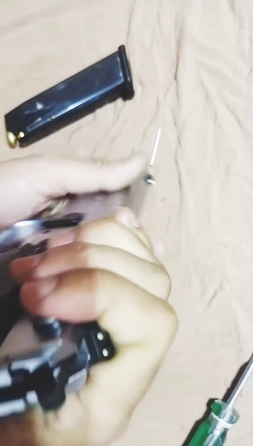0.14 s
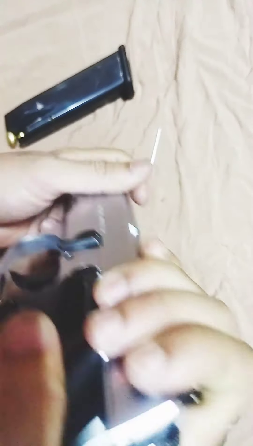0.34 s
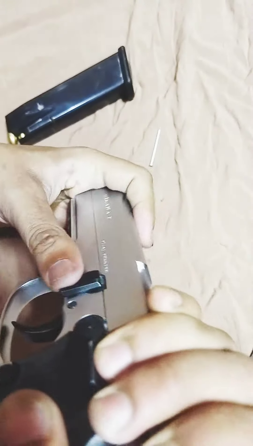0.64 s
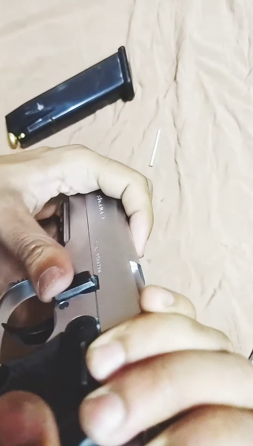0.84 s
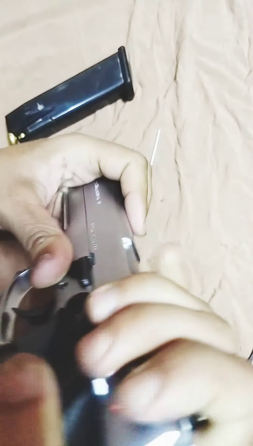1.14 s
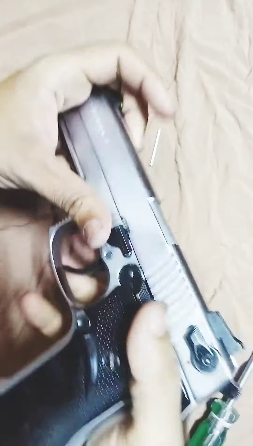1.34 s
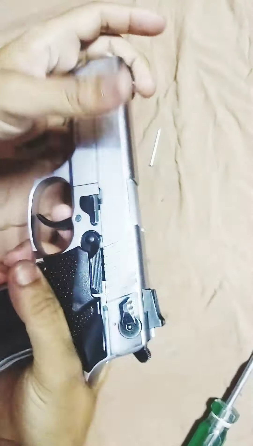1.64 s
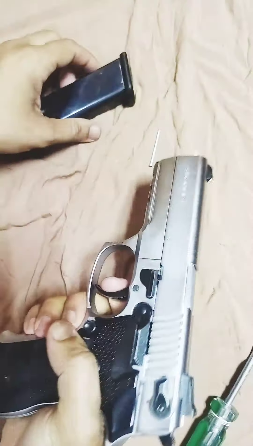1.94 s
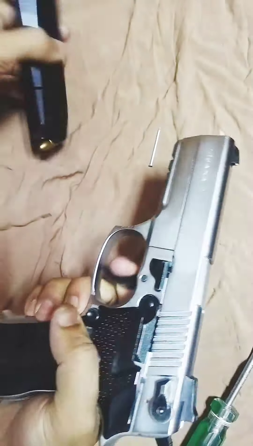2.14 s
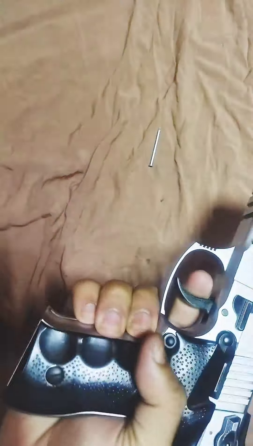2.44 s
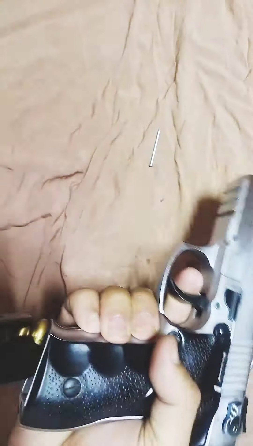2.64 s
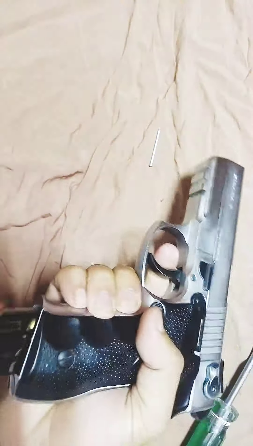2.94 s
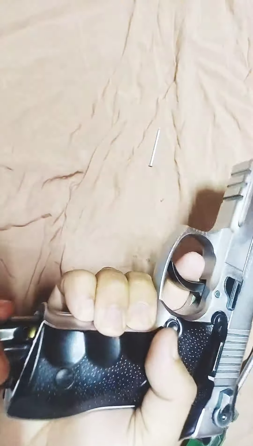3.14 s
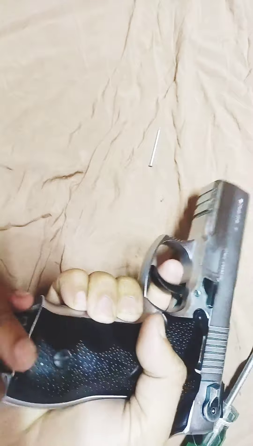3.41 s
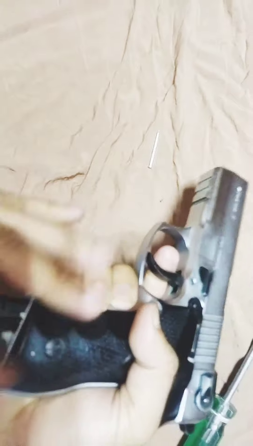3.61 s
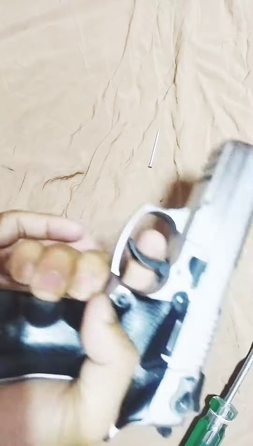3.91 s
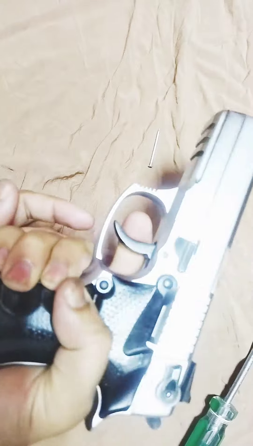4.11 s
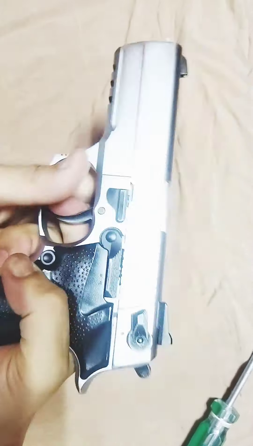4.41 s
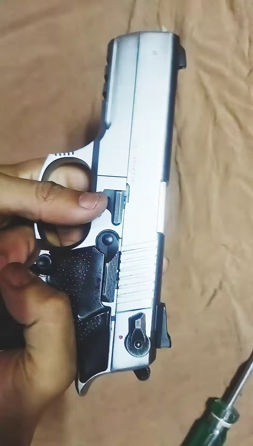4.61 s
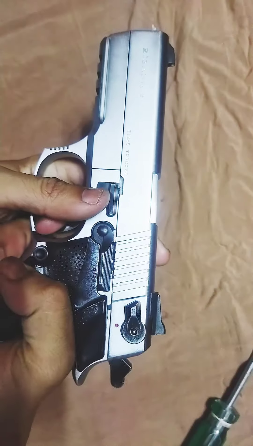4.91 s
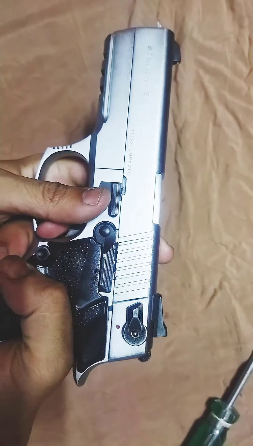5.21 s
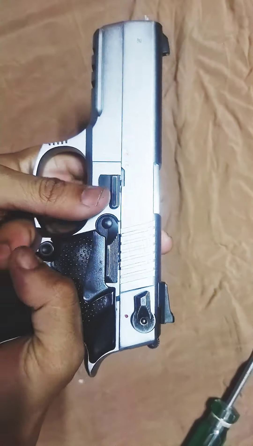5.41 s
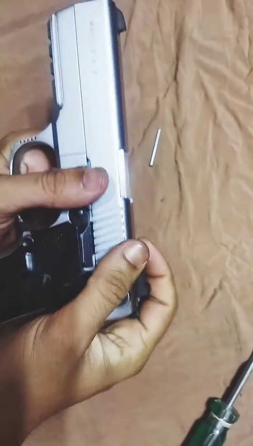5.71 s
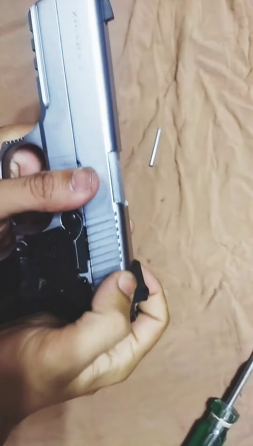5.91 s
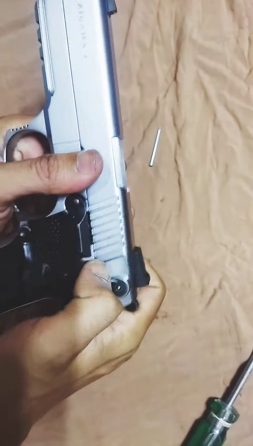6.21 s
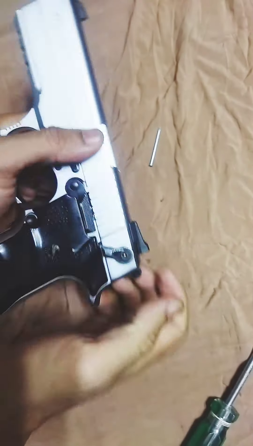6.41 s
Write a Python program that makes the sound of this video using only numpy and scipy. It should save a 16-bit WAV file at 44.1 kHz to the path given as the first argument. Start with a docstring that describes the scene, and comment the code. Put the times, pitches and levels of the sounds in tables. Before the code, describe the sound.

Sharp metal clicks, snaps and taps of a steel pistol being handled up close in a small room, over a faint fan hum.

```python
"""Sharp metal snaps, taps and slides: a steel pistol handled close to a phone in a small furnished room.
Each contact is a short rattle of colliding edges plus two knocks, echoed by the walls. The slide rings
when it locks home and, harder, when the hammer falls. Fingers rub the grip, a few puffs and jolts
reach the phone, and a fan hums faintly under the room noise."""
import sys
import numpy as np
from scipy import signal
from scipy.fft import rfft, irfft
from scipy.io import wavfile
from scipy.ndimage import uniform_filter1d

SR = 44100
rng = np.random.default_rng(int(sys.argv[2]) if len(sys.argv) > 2 else 0)


def to_wav(s):
    """Save 16-bit WAV."""
    ch = np.atleast_2d(s).T  # columns
    pcm = np.round(np.clip(ch, -1, 1) * 32767)  # PCM
    wavfile.write(sys.argv[1], SR, pcm.astype(np.int16))


N = 288855
T = np.arange(N) / SR
SIDE_SIGN = np.array([[1], [-1]])  # left, right


def amp(db):
    return 10 ** (np.asarray(db) / 20)


def unit_rms(x):
    return x / np.sqrt(np.mean(x ** 2))


def fade(t, t60_s):
    """Exponential decay, -60 dB at t60_s."""
    return np.exp(-np.log(1000) * t / max(t60_s, 1e-3))


def on_bins(table, size):
    """Interpolate (Hz, value) rows onto FFT bins."""
    hz, value = np.transpose(table)
    return np.interp(np.log(np.fft.rfftfreq(size, 1 / SR) + 1), np.log(hz + 1), value)


def colour(x, table):
    """Filter by (Hz, dB) rows."""
    size = x.shape[-1]
    return irfft(rfft(x) * amp(on_bins(table, size)), size)


def noise_band(hz, width_hz):
    """Noise through one resonance."""
    return unit_rms(signal.lfilter(*signal.iirpeak(hz, hz / width_hz, fs=SR), rng.standard_normal(N)))


def wander(rate_hz):
    """Random steps, smoothed twice."""
    hold = int(SR / rate_hz)
    steps = np.repeat(rng.standard_normal(N // hold + 1), hold)
    return uniform_filter1d(uniform_filter1d(steps, hold), hold)[:N]


def stereo(mid, side, correlation):
    return np.sqrt(1 + correlation) * mid + np.sqrt(1 - correlation) * SIDE_SIGN * side


def add(out, start_s, x):
    i = int(start_s * SR)
    out[..., i:i + x.shape[-1]] += x[..., :N - i]


def room_noise():
    """Slowly swelling noise, alike left and right in the bass; the treble flickers."""
    # Noise spectrum. Each row: frequency in Hz, relative density in dB.
    spectrum = [(15, -81.5), (25, -53), (85, -21.5), (114, -6), (171, -9), (196, -3.5), (337, -9.5),
                (441, -15), (548, -10), (893, -18.5), (995, -15), (2570, -24), (4660, -43),
                (13800, -52.5), (16200, -49.5)]
    # Stereo likeness. Each row: frequency in Hz, left-right correlation.
    likeness = [(60, 0.87), (130, 0.86), (290, 0.73), (640, 0.49), (1410, -0.16), (3100, 0.05),
                (6820, -0.76), (15000, 1)]
    correlation = np.clip(on_bins(likeness, N), -.95, .98)
    mid, side = rfft(rng.standard_normal((2, N)))
    noise = unit_rms(colour(irfft(stereo(mid, side, correlation), N), spectrum))
    treble = colour(noise, [(2500, -40), (4500, 0), (16000, 0)])
    flicker_db = 2.5 + 2.5 * wander(12)
    noise = noise + treble * (amp(flicker_db) - 1)
    return amp(-50.5 + 1.5 * wander(3)) * noise


def fan_hum():
    """A wavering fan tone over two lower bands of rumble."""
    # Hum levels. Each row: time in seconds, tone in dB, rumble in dB.
    levels = [(0, -54, -50), (.27, -50, -55), (.42, -60.5, -51), (.6, -48.5, -56.5), (.95, -57.5, -49),
              (1.5, -54, -53.5), (1.81, -72, -48.5), (1.95, -51, -53), (2.25, -53, -53.5),
              (3.1, -56, -56.5), (3.6, -55.5, -53), (3.9, -52.5, -56), (4.25, -60, -56), (4.6, -54.5, -57),
              (5.1, -62, -53.5), (5.5, -56, -57.5), (5.9, -50, -56.5), (6.55, -64, -61)]
    time_s, tone_db, rumble_db = np.transpose(levels)
    tone_hz = 174.5 + 3 * wander(8)
    tone = np.sqrt(2) * np.sin(2 * np.pi * np.cumsum(tone_hz) / SR)
    rumble = unit_rms(noise_band(127.5, width_hz=15) + 0.65 * noise_band(111.5, width_hz=12))
    flutter_db = 3 * wander(11)
    tone_gain = amp(np.interp(T, time_s, tone_db) + flutter_db)
    return tone_gain * tone + amp(np.interp(T, time_s, rumble_db)) * rumble


def rubbing():
    """Skin slides on steel: grainy hiss and a duller scuff. Strokes swell, hold and die away. The scene also
    opens on a fading hiss, and another hiss trails the snap at 0.38 s."""
    # Strokes. Each row: time of full level in seconds, hold in seconds, level in dB, swell and decay
    # in seconds per 20 dB (sign ignored), scuff relative to hiss in dB.
    strokes = [(0, 0.021, -51, .05, 0.07, 2.5), (0.196, 0.019, -66, -0.4, -0.3, -22),
               (0.312, 0.18, -70, -0.1, 0.08, 5), (.405, 0, -59.5, -0.7, 0.17, -8),
               (.44, 0, -80, 8, 0.6, -9), (1.329, 0.035, -63.5, 0.3, 0.24, -8),
               (2.335, 0.033, -64.5, 0.37, .1, 2.5), (3.59, 0.022, -66.5, 0.3, .04, -6),
               (3.868, 0.0041, -60.5, 0.28, 0.26, 1), (3.94, 0.031, -40.5, 0.05, -0.0073, -9.5),
               (4.04, .01, -58, 0, .05, -6), (4.126, .045, -32.5, 0, .06, -12.5),
               (4.26, 0.052, -59.5, -0.05, 0.18, 0.5), (5.55, 0, -67, 0.33, 0.21, 11.5),
               (6.165, 0, -52, 0.11, -0.08, -8.5), (6.458, 0.01654, -72, 0, .2, -2.5)]
    # Hiss spectrum. Each row: frequency in Hz, relative density in dB.
    hiss_spectrum = [(4000, -13), (5000, -3.5), (8200, -9.5), (9700, -1), (11000, -15), (12400, 0.5),
                     (15500, -7.5)]
    grain = amp(2.5 * wander(150) + 1.6 * wander(25))
    mid, side = rng.standard_normal((2, N))
    friction = grain * stereo(mid, side, correlation=0)
    hiss = unit_rms(colour(friction, [(2500, -56)] + list(hiss_spectrum)))
    scuff = unit_rms(colour(friction, [(500, -23), (1500, -1), (4000, -4), (6000, -36.5)]))
    out = np.zeros((2, N))
    for full_s, hold_s, db, swell_s, decay_s, scuff_db in strokes:
        drop_db = 20 * np.where(T < full_s, (full_s - T) / abs(swell_s),
                                np.maximum(T - full_s - hold_s, 0) / abs(decay_s))
        out += amp(db - drop_db) * (hiss + amp(scuff_db) * scuff)
    return out


def thumps():
    """Air puffs and jolts at the phone: pressure builds, lets go and swings out, heavily damped."""
    # Each row: time in seconds, level in dB, build-up in seconds, pitch in Hz, T60 in seconds,
    # right gain relative to left.
    jolts = [(0.9623, -16.5, 0.0047, 400, 0.013, 0.4), (4.108, -30, 0.003, 60.71, 0.026, -.3),
             (5.161, -20.5, 0.00077, 224.6, 0.039, 0.51)]
    out, t = np.zeros((2, N)), np.arange(-512, 8192) / SR
    for time_s, db, build_s, hz, t60_s, right_gain in jolts:
        build = np.clip(1 + t / build_s, 0, 1)
        swing = np.cos(2 * np.pi * hz * t) * fade(np.abs(t), t60_s)
        add(out, time_s + t[0], amp(db) * np.array([[1], [right_gain]]) * np.where(t < 0, build, swing))
    return out


def wall_echoes(send):
    """Dense echoes that build up after the first wall and last longest in the midrange."""
    # Echo spectrum. Each row: frequency in Hz, relative level in dB.
    spectrum = [(300, -17), (1000, -4), (2000, -0.5), (4000, -3), (8000, -4), (12000, -2), (15500, -1.5)]
    # Room decay. Each row: frequency in Hz, T60 in seconds.
    decay_times = [(500, 0.16), (1500, .45), (4000, .45), (8000, 0.33), (14000, 0.24)]
    first_wall_s, early_gain, echo_db = .013, .55, -7.5
    t = np.arange(int(.7 * SR)) / SR
    mid, side = colour(rng.standard_normal((2, len(t))), spectrum)
    _, frame_s, frames = signal.stft(stereo(mid, side, correlation=0.23), SR, nperseg=256)
    decay = np.exp(-np.log(1000) * frame_s / on_bins(decay_times, size=256)[:, None])
    tail = signal.istft(frames * decay, SR, nperseg=256)[1][:, :len(t)]
    tail *= early_gain + (1 - early_gain) / (1 + np.exp(-(t - first_wall_s) / 2e-3))
    tail /= np.sqrt(np.sum(tail ** 2) / 2)
    return amp(echo_db) * signal.fftconvolve(send[None], tail, axes=1)[:, :N]


def slide_ring(blows):
    """Blows ring the hand-damped slide; each microphone port gets its modes with random signs."""
    # Steel modes. Each row: frequency in Hz, level in dB, T60 in seconds.
    steel_modes = [(3300, -8, .015), (3750, -7, .015), (4100, -7, .015), (4600, -9, .015),
                   (5300, -12, .012), (6080, -9, .03), (6200, -10, .03), (6580, -6, .03), (6830, -5, .03),
                   (7030, -7, .04), (8740, -8, .05), (8860, -8, .06), (9010, -9, .05), (9600, -11, .02),
                   (12070, -6, .04), (12280, -5, .04), (12490, -5, .04), (13800, -9, .02), (14450, -7, .02)]
    t = np.arange(SR // 4) / SR
    modes = np.array([amp(db) * fade(t, t60_s) * np.sin(2 * np.pi * hz * t)
                      for hz, db, t60_s in steel_modes])
    port_gains = amp(2 * SIDE_SIGN) * rng.choice([-1, 1], (2, len(steel_modes)))
    return signal.fftconvolve(blows[None], port_gains @ modes, axes=1)[:, :N]


def knock(t, hz, db, t60_cycles):
    """One struck mode: swings up within a cycle, then decays."""
    envelope = np.clip(t * hz, 0, 1) * fade(np.abs(t), t60_cycles / hz)
    return amp(db) * envelope * np.sin(2 * np.pi * hz * t)


def small_modes(x, count=120, spread_db=3.5):
    """Many small modes add random spectral peaks and dips."""
    hz = np.linspace(0, SR / 2, count)
    return colour(x, list(zip(hz, spread_db * rng.standard_normal(count))))


def chatter_spectrum(envelope):
    """Colliding edges: a whitened noise burst, partly shared by the two ports."""
    noise = rng.standard_normal((3, len(envelope)))
    spectrum = rfft((noise[0] + 1.2 * noise[1:]) * envelope)
    return spectrum / np.sqrt(uniform_filter1d(np.abs(spectrum) ** 2, size=50))


def contacts():
    """Steel edges scrape in, meet and chatter out. Returns direct sound, slide blows and echo send."""
    # Contacts. Each row: time in seconds, level in dB, tilt in dB per octave going down and going up
    # from the knee, hollow knock in Hz and relative dB, edge knock in Hz and relative dB,
    # left minus right in dB, echo send in dB.
    clicks = [(0.3809, -18.5, -5, 4, 870.2, -25.5, 4030, -12, -1, -21),
              (0.9611, 0, -3.5, -2, 1350, -14.5, 4300, -10, -1.5, -9),
              (1.1222, -18.5, -1, -10.5, 1225, -8, 1640, -12, 0.5, -13.5),
              (1.7167, -27.5, -4.5, -8.5, 1103, -1, 2230, 6.5, 9, -9.5),
              (2.535, -10.5, -5.5, -1.5, 1067, -25, 4844, -9.5, 2, -12),
              (2.5575, -24.5, 5.5, -6, 1480, -18, 1870, -5, -4, -2.5),
              (2.6692, -30, 1, -2.5, 1020, -12, 2150, -13, 2, -8),
              (2.7366, -16.5, -2.5, -3, 721.6, -17.5, 3630, -12, 0, -7),
              (2.764, -31, 5, -11.5, 905, -10, 1640, -11, 2, -4),
              (2.7805, -24, 2.5, -5, 1210, -20, 2230, -4.5, 2, -8),
              (2.8309, -30.5, 7.5, -7.5, 676.2, -7, 2240, 1, 0, 3),
              (2.8623, -5, 1, -3.5, 890, -3.5, 2180, -8.5, 0, -12.5),
              (2.8804, -26, 4, -12.5, 800, -18, 2200, -14, 16, -11),
              (3.027, -22, 1, -3.5, 905, -29, 4770, -0.5, 4.5, -9),
              (3.1242, -31.5, 2.5, -23, 1434, -13, 1760, -4, -1, -9),
              (3.1586, -26.5, 3, -5, 1018, -2.5, 2940, -8.5, 2.5, -13),
              (3.4639, -15.5, 1.5, -13.5, 1500, -3.5, 1690, -12.5, -1, -12.5),
              (3.4754, -25.5, 4, -3, 1220, -19, 2180, -3.5, 5, -6),
              (3.5063, -22.5, 4, -12, 1500, -5, 1760, -4, 0, -26),
              (3.6231, -38, 7, -7.5, 1340, -16, 1750, -1, -0.5, -11.5),
              (3.7812, -33.5, 5.5, -19, 1407, -21.5, 1720, -6, 0, -9),
              (3.8655, -26.5, 1, -12.5, 1010, -20, 1663, -6.5, 2, -6),
              (3.9458, -14.5, 1.5, -5, 1170, -29.5, 2196, -9, -3, -4.5),
              (3.9504, -10.5, -2, -5.5, 1230, -7.5, 1607, -10.5, 5.5, -18),
              (3.9584, -19.5, -0.5, -15, 1170, -2, 1813, -3.5, -8, -20),
              (4.0454, -36, 4, 3, 1050, -18.5, 1890, -9, 1, -8),
              (4.107, -10.5, -3.5, 2, 1002, -18, 4970, -21, 1, 0.5),
              (5.0438, -30, 2.5, 1.5, 748, -20.5, 3500, -13, 5.5, -9.5),
              (5.1567, -2.5, -2.5, 1, 1370, -23, 5200, -5.5, -6, -1),
              (5.1619, -6.5, -1.5, 1.5, 1045, -15, 4100, -19, 15, -2.5),
              (5.1644, -7.5, 0.5, 1.5, 930, -15.5, 3314, -13, -6.5, 1),
              (5.1704, -5, -4, 15, 1427, -23, 4200, -12, -2, -8.5),
              (5.1794, -5, -8, 7.5, 900, -28.5, 3520, -11, 0, 2),
              (5.4379, -35.5, -4, -8, 671, -25, 3459, -5, 4, -4),
              (5.5013, -20.5, -2, -1.5, 1270, -18, 4996, -6, 1, -7),
              (6.0939, -18.5, -5.5, -4.5, 1088, -20.5, 4440, -8, 3.5, -14.5),
              (6.1339, -22.5, -3, 4.5, 1312, -26.5, 2156, -12, 13, -10),
              (6.15, -29.5, 0.5, 5, 972, -24, 2540, -14.5, 4, -16)]
    # Small parts radiate no bass. Each row: frequency in Hz, gain in dB.
    radiation = [(350, -44), (560, -15.5), (750, -2), (900, 0.5), (6000, -0.5), (9000, -3), (13500, 0.5),
                 (16500, -3)]
    knee_hz = 4165
    lock_s, hammer_s = (.95, .97), (5.15, 5.19)  # from, to
    direct, blows, send = np.zeros((2, N)), np.zeros(N), np.zeros(N)
    t = np.arange(-256, 3840) / SR
    octaves = np.log2((np.fft.rfftfreq(len(t), 1 / SR) + 1) / knee_hz)
    for time_s, db, down_db, up_db, hollow_hz, hollow_db, edge_hz, edge_db, pan_db, send_db in clicks:
        is_lock = lock_s[0] < time_s < lock_s[1]
        is_hammer = hammer_s[0] < time_s < hammer_s[1]
        build_s, t60_s = (.00091, .012) if is_hammer else (.00055, .017)
        envelope = np.where(t < 0, np.exp(t / build_s), fade(np.abs(t), t60_s))
        chatter = chatter_spectrum(envelope)
        tilt_db = np.where(octaves < 0, down_db * np.minimum(-octaves, 2.2), up_db * octaves)
        rattle = irfft(chatter * amp(tilt_db + on_bins(radiation, len(t))), len(t))
        rattle = unit_rms(rattle) * np.sqrt(np.mean(envelope ** 2))
        knocks = knock(t, hollow_hz, hollow_db, t60_cycles=15.3)
        knocks += knock(t, edge_hz, edge_db, t60_cycles=36)
        start_s = time_s + 0.0011 + t[0]
        add(direct, start_s, amp(db + SIDE_SIGN * pan_db / 2) * (amp(-6.5) * rattle + knocks))
        ring_gain = is_hammer * amp(-13) + is_lock * amp(-21.5)
        add(blows, start_s, ring_gain * amp(db) * irfft(chatter[0], len(t)))
        wall_rattle = small_modes(rattle[0]) * (t > -3e-3)
        add(send, start_s, amp(db + send_db) * (0.77 * wall_rattle + 0.79 * knocks))
    return direct, blows, send


def scene():
    direct, blows, send = contacts()
    ring = slide_ring(blows)
    echoes = wall_echoes(send + 1.3 * ring[0])
    return direct + ring + echoes + thumps() + rubbing() + room_noise() + fan_hum()


def record(dry):
    """The phone loses the deepest bass, rounds the loudest peaks and cuts the top treble."""
    # Overall tone: deepest bass softened, treble cut off steeply above 16 kHz.
    # Each row: frequency in Hz, gain in dB.
    overall_tone = [(20, -5), (70, 0), (15750, 0), (16050, -24), (17000, -25.5)]
    cutoff_hz = 16600
    rounded = np.tanh(colour(dry, overall_tone))
    return signal.sosfilt(signal.ellip(10, .2, 80, cutoff_hz, fs=SR, output="sos"), rounded)


dry = scene()
out = record(dry)
to_wav(out)
```